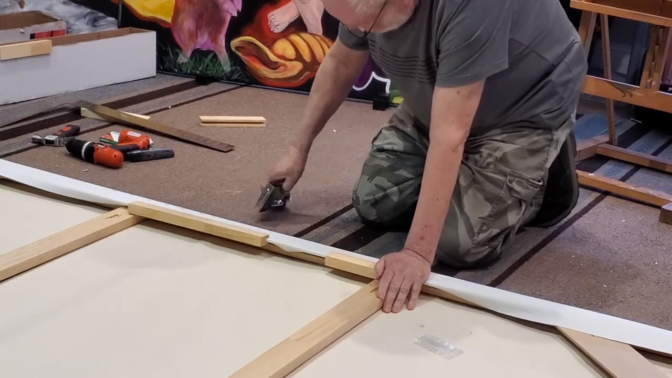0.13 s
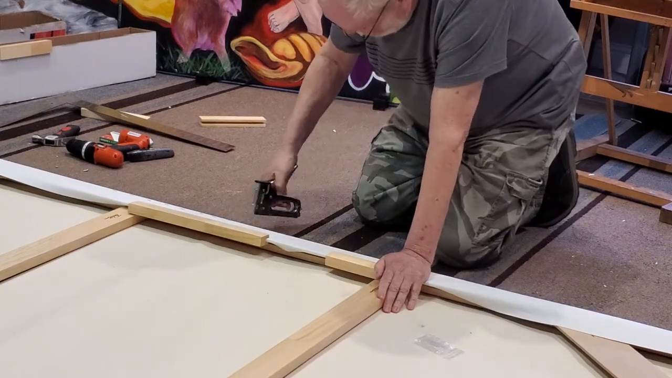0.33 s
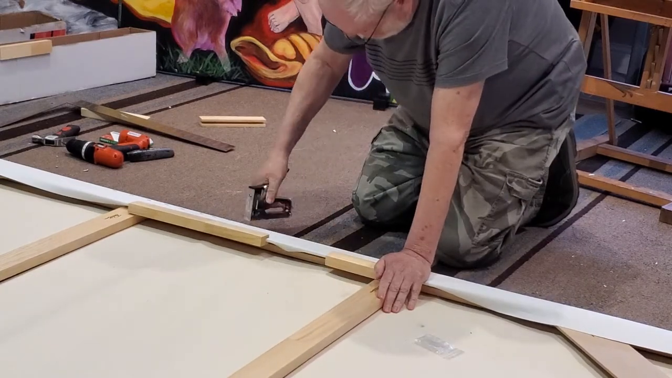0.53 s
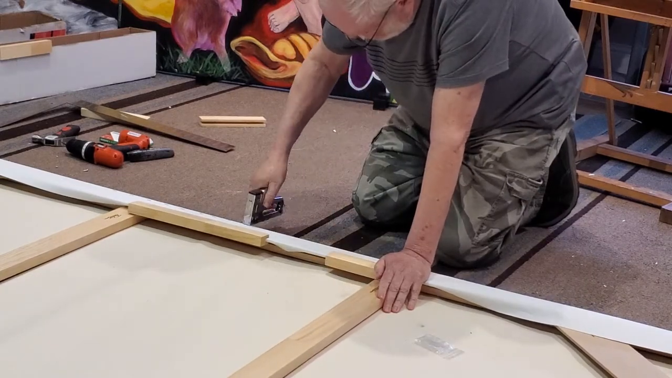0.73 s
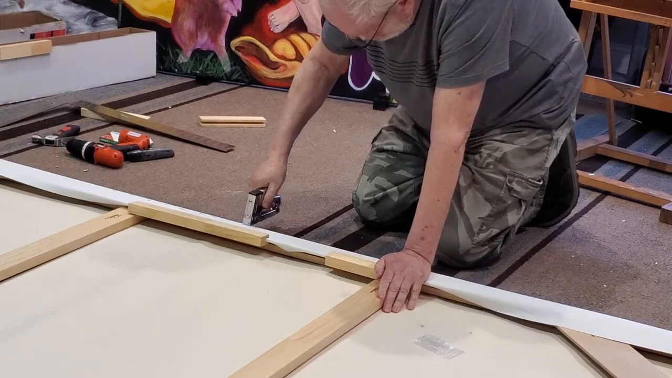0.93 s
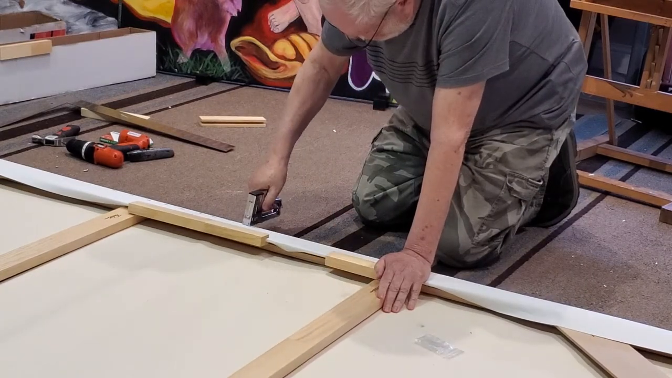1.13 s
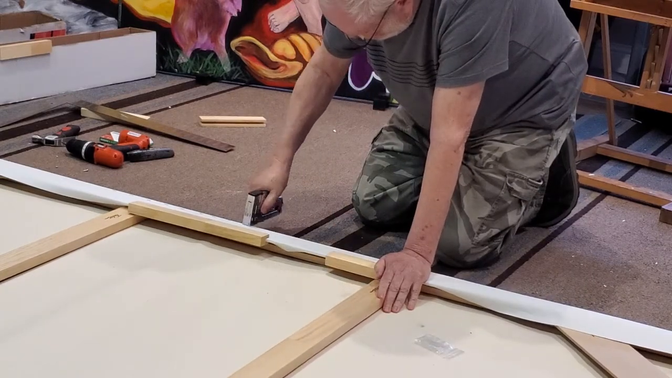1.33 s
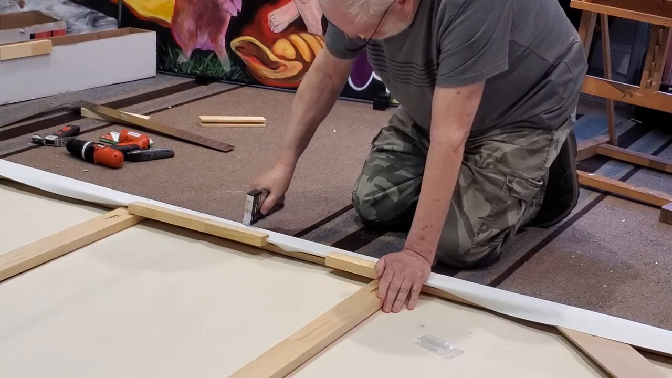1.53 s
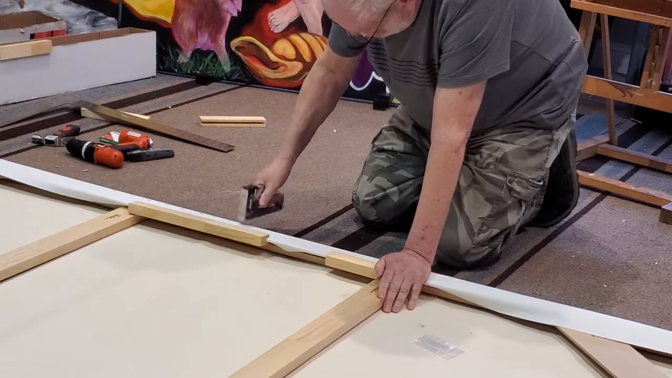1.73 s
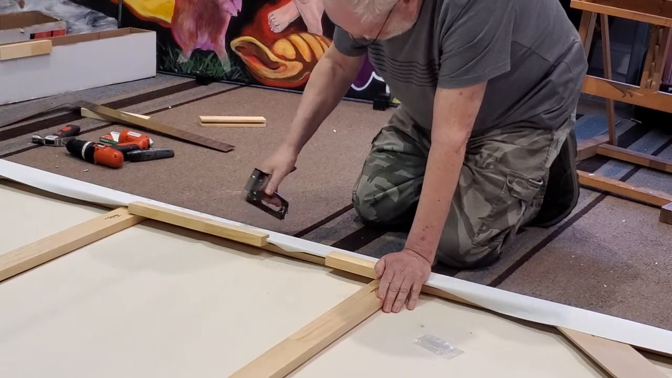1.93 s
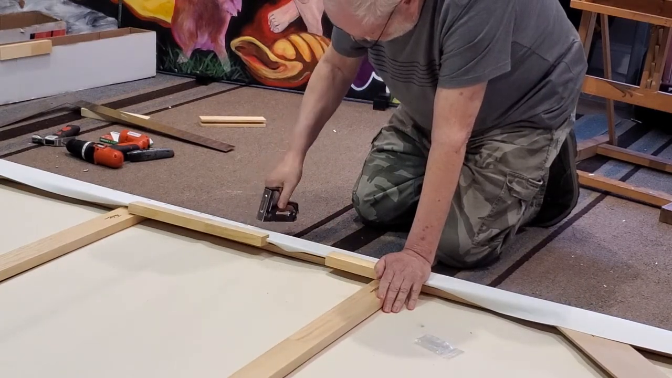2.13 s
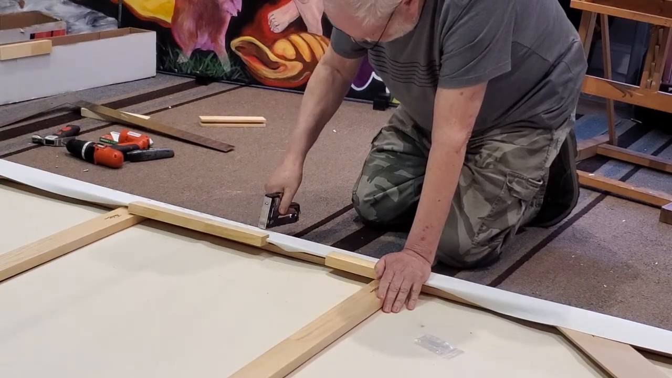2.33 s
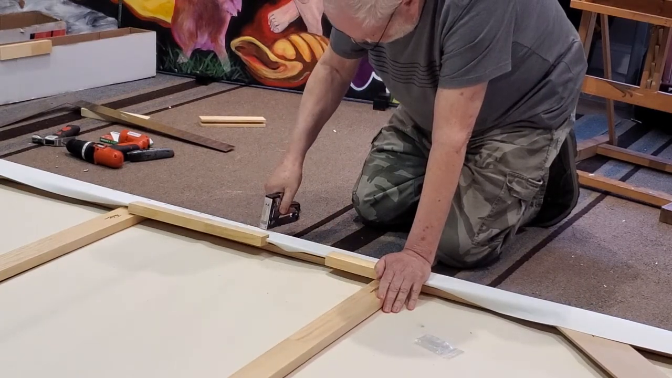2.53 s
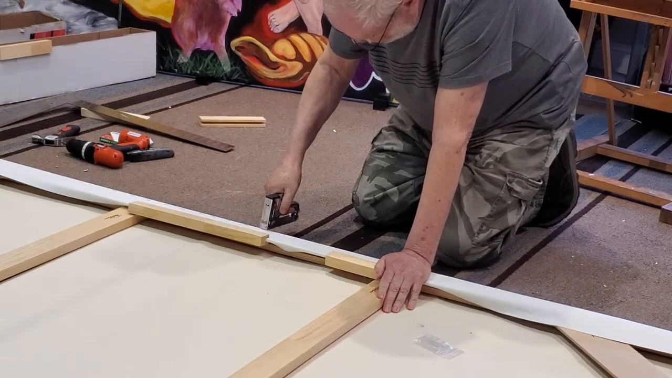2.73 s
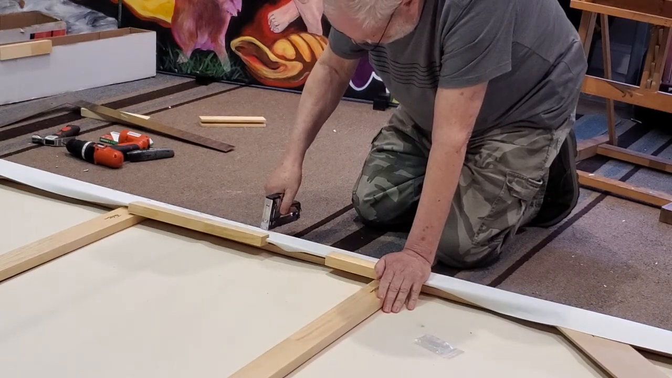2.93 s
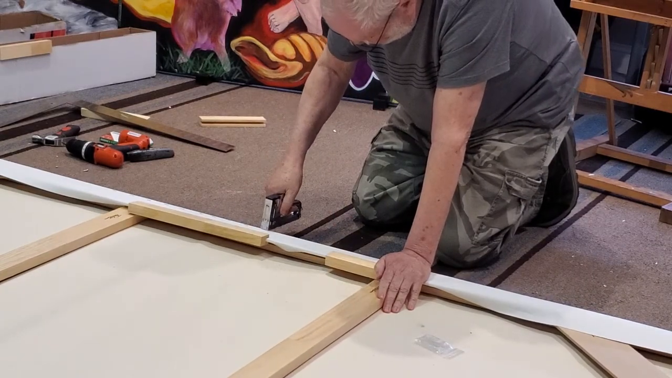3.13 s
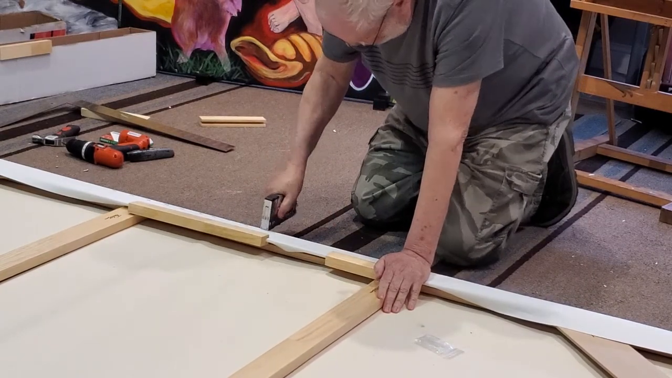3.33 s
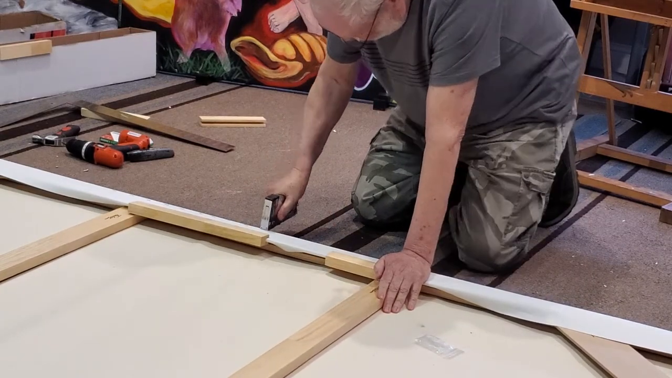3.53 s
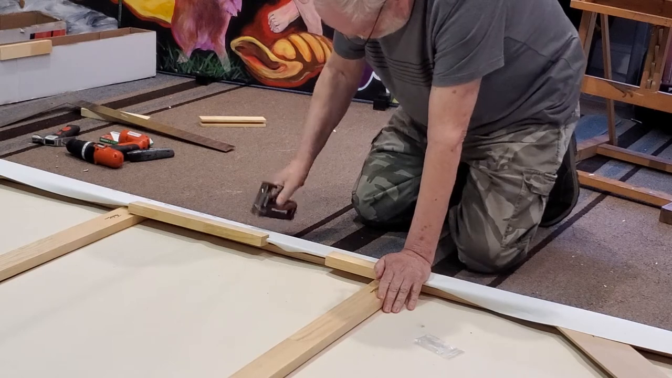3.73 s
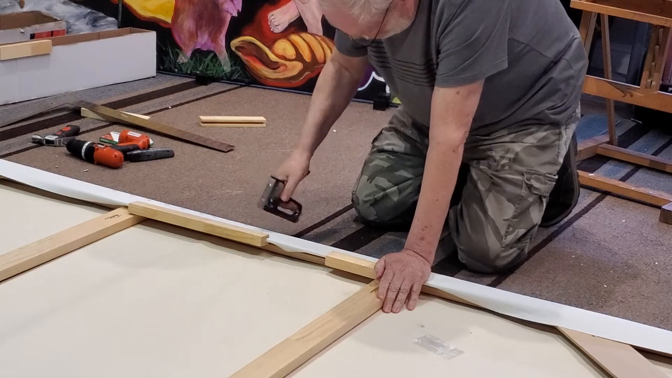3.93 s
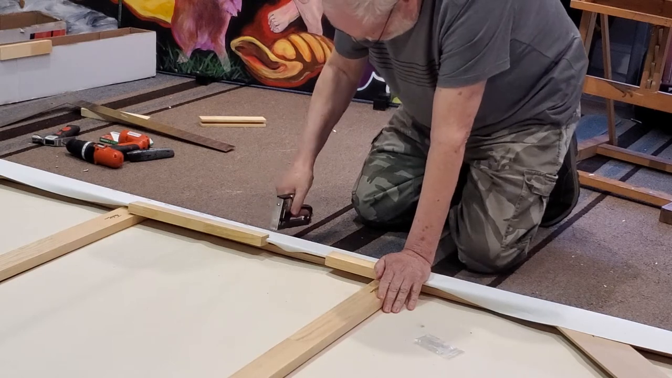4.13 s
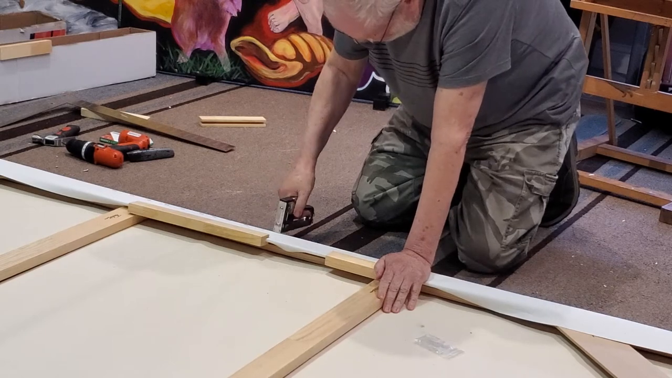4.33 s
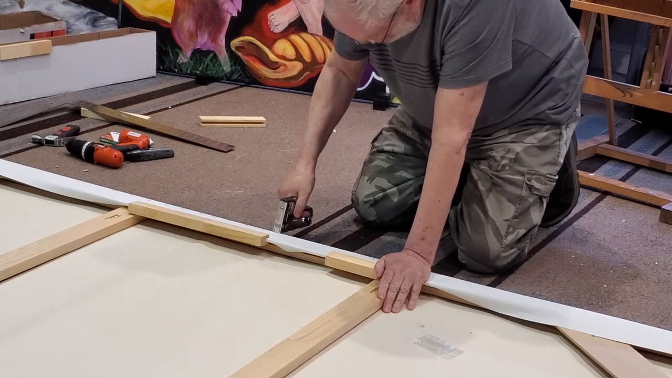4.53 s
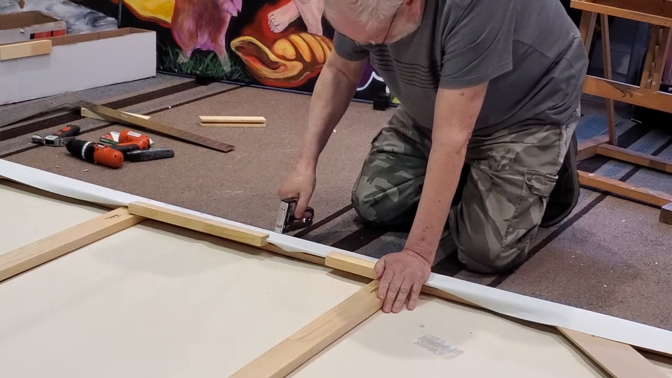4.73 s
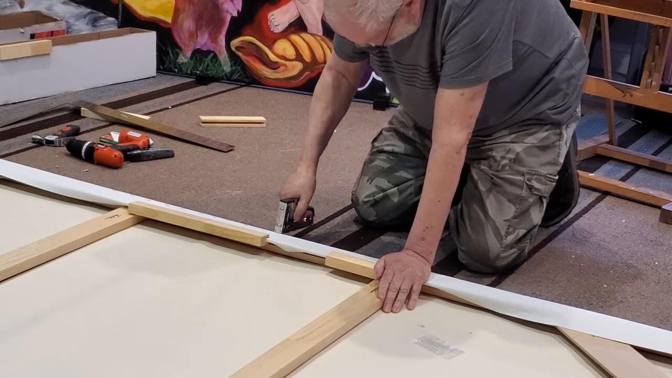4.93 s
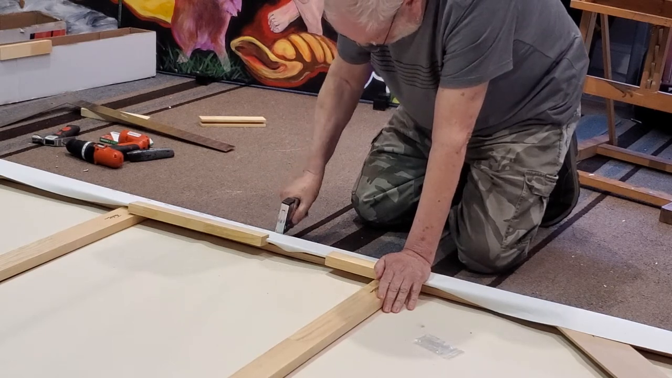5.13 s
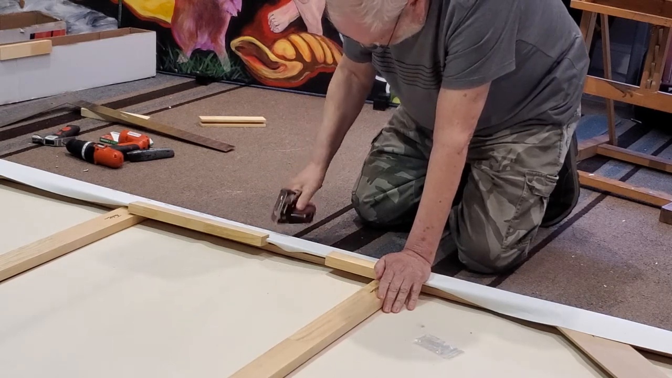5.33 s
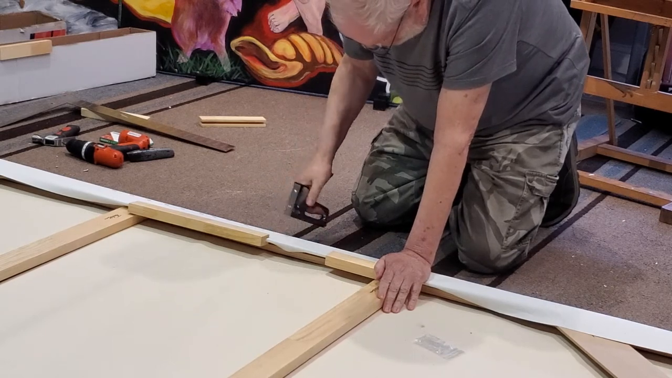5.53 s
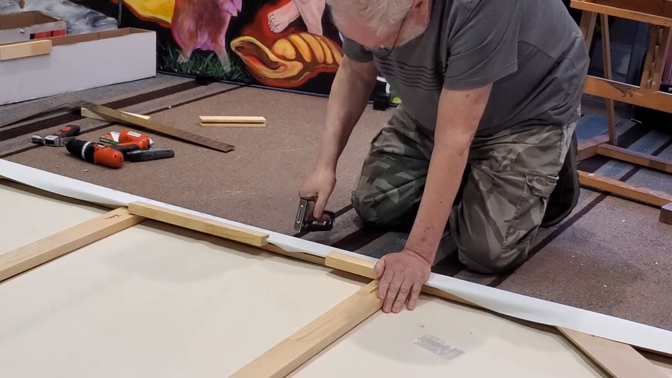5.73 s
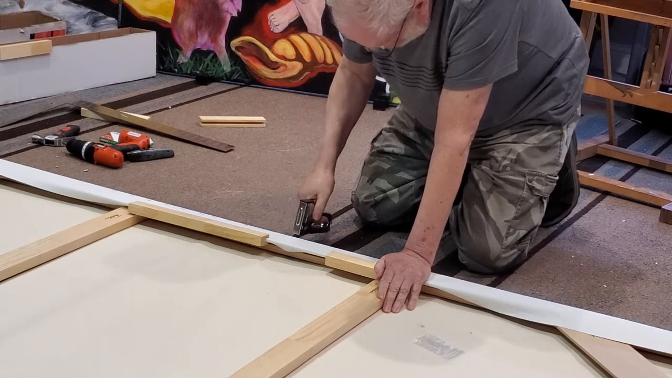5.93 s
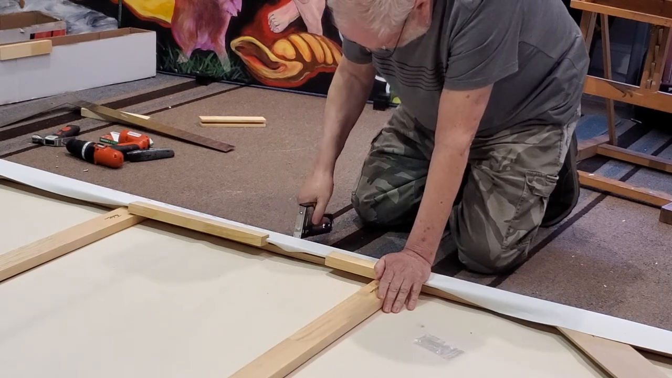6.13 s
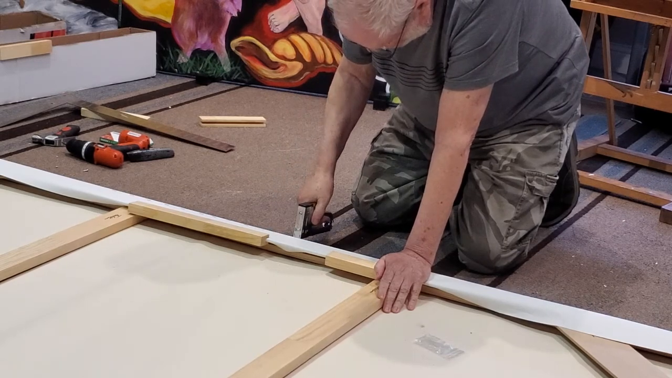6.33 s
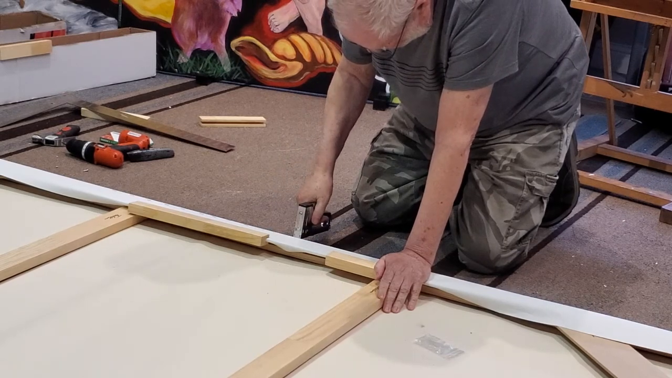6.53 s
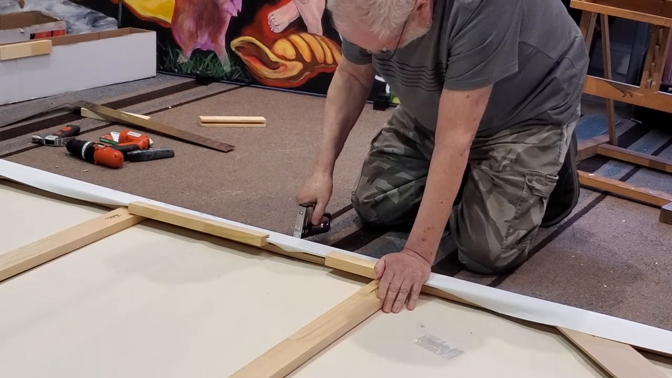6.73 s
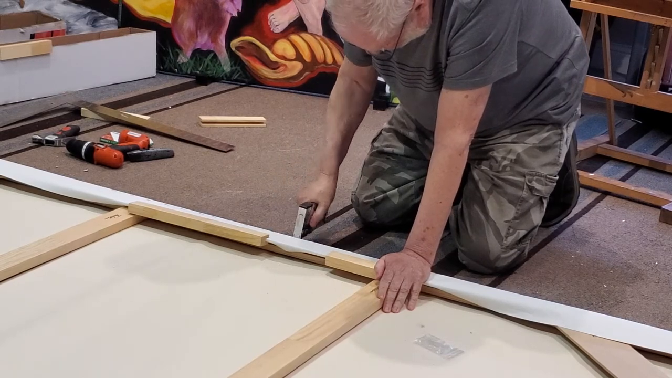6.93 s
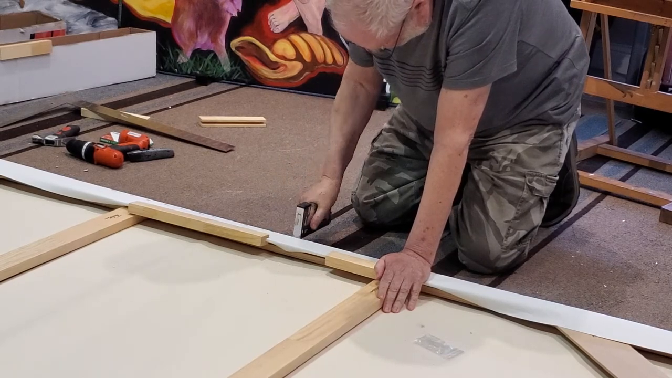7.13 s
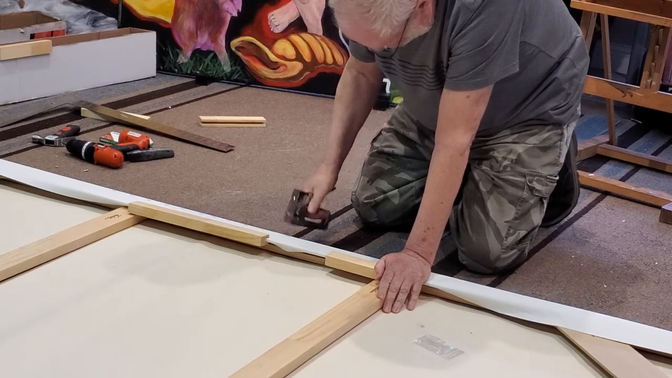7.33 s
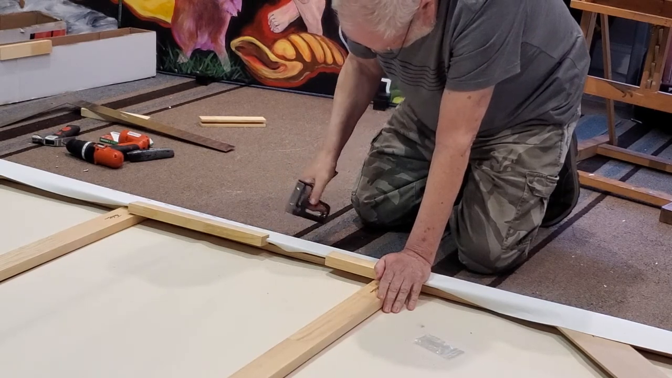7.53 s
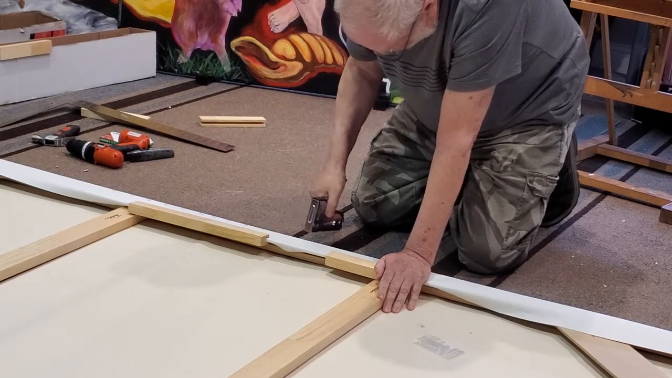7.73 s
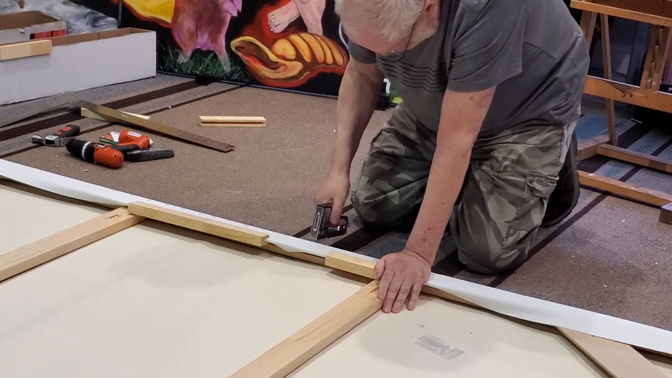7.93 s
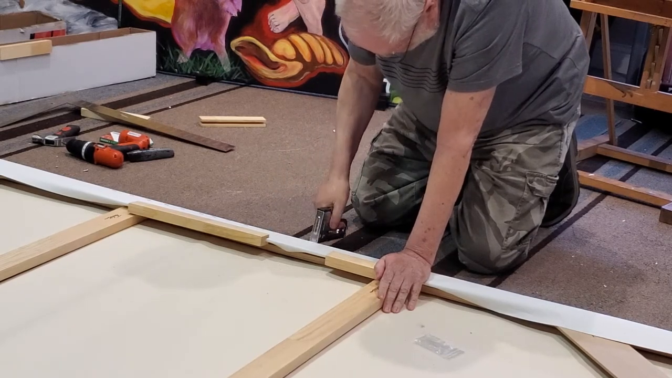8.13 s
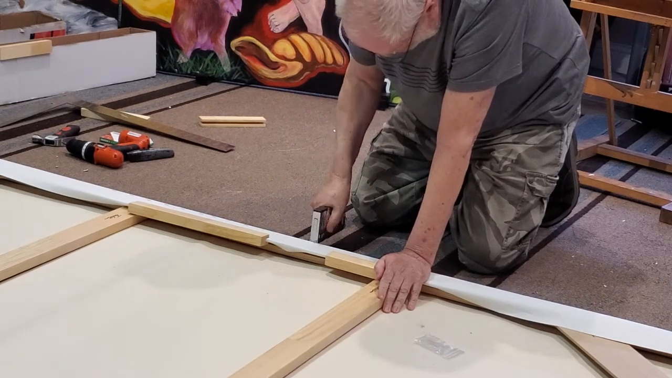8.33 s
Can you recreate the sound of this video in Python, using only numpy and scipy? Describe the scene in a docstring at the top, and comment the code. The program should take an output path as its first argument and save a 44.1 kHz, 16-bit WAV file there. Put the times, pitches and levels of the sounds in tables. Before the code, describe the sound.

A hand staple gun clicks and rattles as it is lifted in the first half second, with a few soft bumps against a wooden frame. After faint taps and a scuff on canvas, it fires at about 1.6, 3.5, 5.1 and 7.1 seconds. Each shot is a loud, sharp steel crack over a short ringing thud of wood and a slight buzz of the spring, its tone a little different each time. About 0.3 seconds after every shot, the lever springs back with a lighter, bright metal clack. Very faint ticks, lever scrapes and canvas rubs lead into the shots, and a few more come between 8 and 8.4 seconds. The gun is near and slightly to the right, and the room answers each blow with a short echo. A faint low motor and electrical hum pulses slowly underneath throughout.

```python
"""A studio floor: a hand staple gun drives four staples through canvas into a wooden stretcher frame.
The nose scuffs into place, the lever scrapes on its spring, the striker slams home and the lever clacks
back. Each hit layers a noisy steel crack over ringing wood, and the ceiling and walls answer every blow.
Underneath, a motor in the building beats slowly against the mains hum."""
import sys
import numpy as np
from scipy import signal
from scipy.fft import rfft, irfft, next_fast_len
from scipy.io import wavfile
from scipy.ndimage import uniform_filter1d, map_coordinates

SR = 44100
rng = np.random.default_rng(int(sys.argv[2]) if len(sys.argv) > 2 else 0)


def generate_wav(signal):
    """Clip the signal to [-1, 1] and save it as 16-bit WAV at the path in sys.argv[1]."""
    frames = np.transpose(np.atleast_2d(signal))
    scaled = np.clip(frames, -1, 1) * 32767
    pcm = np.round(scaled).astype(np.int16)
    wavfile.write(sys.argv[1], SR, pcm)


N = 369999
T = np.arange(SR * 3 // 4) / SR  # time axis of one hit

# Levels in the tables are relative: each layer adds its own trim.
# staple hits, each barking at its own two pitches:
# start_s, level_db, thud_db, bar_db, low_bark_hz, low_bark_db, high_bark_hz, high_bark_db
SHOTS = [(1.559, -2, -16, -18, 1120, -11.5, 2350, -14), (3.506, -3, -16, -18, 1580, -17, 2800, -15),
         (5.097, -2.5, -18.5, -19.5, 1060, -12.5, 1407, -13.5),
         (7.086, -3.5, -14.5, -17.5, 820, -13, 1660, -8.5)]
# the striker shears off a staple, drives it home and rebounds: delay_s, level_db, t60_s
STRIKER_PULSES = [(0, -11.5, .03), (.0028, 1.5, 0.016), (.005, -4, .016)]
# the lever springs back to its stop: start_s, level_db
RETURNS = [(1.8284, -10.5), (3.7967, -11.5), (5.3853, -10.5), (7.3739, -10.5)]
# lever squeezes: start_s, hold_s, level_db, squeak_hz, squeak_db
SQUEEZES = [(0.013, .05, -62.5, 3080, -12), (1.356, .16, -80, 10910, -1), (3.31, .08, -73.5, 3780, -6),
            (3.389, .08, -64.5, 3870, -7.5), (4.92, .13, -69, 1445, -4), (6.895, 0.093, -70.5, 3900, -0.5),
            (8.195, .19, -76, 3784, -10)]
# ticks of the gun in the hand: start_s, level_db, treble_db, ping_hz
TICKS = [(0.0701, -29, -11.5, 1800), (0.0964, -30.5, -8.5, 3800), (0.163, -40.5, -12, 3600),
         (0.504, -62, -23, 2000), (1.0685, -60.5, -12, 8550), (1.3551, -65, -8, 11000),
         (3.1395, -61.5, -15, 6400), (3.31, -59.5, -13, 3900), (3.3877, -55, -12.5, 3900),
         (4.9193, -53.5, -11.5, 5110), (6.784, -49, -9.5, 8900), (6.89, -59.5, -4.5, 3900),
         (6.948, -46, -7.5, 3900), (8.1933, -56.5, -8, 6420), (8.2822, -57, -11.5, 11000),
         (8.3454, -53, -2, 11000)]
# nose taps on the canvas-covered bar: start_s, level_db
TAPS = [(0.7408, -54), (0.9494, -61), (6.0577, -58.5), (8.0217, -56)]
# soft bumps against the frame: start_s, level_db
BUMPS = [(0.087, -33), (0.125, -37), (0.212, -45.5), (3.273, -46.5), (8.364, -53)]
# nose scuffs over the canvas: start_s, hold_s, level_db
SCUFFS = [(0.145, 0.073, -60), (1.409, 0.056, -63.5), (3.251, 0.22, -68), (5.033, 0.049, -73),
          (6.92, 0.044, -63.5), (8.35, .04, -61.5)]

# ringing modes: pitch_hz, level_db, t60_s
FRAME_MODES = [(88, -16.5, 0.99), (117.54, -13.5, 0.89), (150, -7, 0.45), (162, -3, 0.36), (176, -6, 0.65),
               (199.4, -3.5, 0.58), (211.5, -0.5, 0.48), (236.3, -2.5, .5), (254, -1.5, 0.38),
               (296.2, 1.5, .33), (320.5, 6, 0.17), (341.7, -6.5, 0.44), (366, -3, 0.24), (440.4, 1, 0.17),
               (607.6, -6, 0.34)]  # frame and canvas on the floor
BAR_MODES = [(909, -2.5, 0.47), (980, 2, .35), (1051, -3, 0.52), (1096, 0.5, 0.22), (1149, -3, 0.37),
             (1443, -4, 0.23), (1673, -2.5, 0.35), (1790, -4.5, 0.28)]  # wooden bar under the staple
SPRING_MODES = [(1438, -4.5, .45), (1520, -1.5, 0.38), (1577, -1.5, 0.35), (3128, -5.5, 0.62),
                (3220, -4.5, 0.45), (3696, -11, 0.5), (3670, -3.5, 0.44)]  # spring and steel case

# resonances of the gun's parts: centre_hz, width_hz, level_db
CASE_BANDS = [(1590, 110, 1.5), (3420, 490, -1), (4900, 410, -1), (6420, 790, -0.5), (8850, 320, 1.5),
              (11500, 640, 1), (14200, 750, -3)]
LEVER_BANDS = [(1550, 120, 4.5), (3700, 400, -0.5), (5160, 700, -5.5), (11240, 1600, -5)]
HANDLE_BANDS = [(1150, 290, 2), (1940, 170, 1), (2230, 130, 4), (3120, 83, 4), (3800, 300, -9),
                (10800, 1330, -11)]
NOSE_BANDS = [(1200, 240, -3.5), (1800, 360, -7), (2590, 350, -1), (3150, 280, -2), (3728, 660, -10)]

# EQ curves of the noise layers: frequency_hz, gain_db
SLAM_EQ = [(80, -15), (170, -5.5), (330, -1), (430, -2.5), (750, -5), (1200, -2), (2300, 0), (3200, 3),
           (4400, -1), (5400, -5), (6600, -4), (7600, -7.5), (9000, -5.5), (13000, -3), (15500, -5)]
CLACK_EQ = [(200, -41), (500, -15.5), (850, -17), (1200, -8), (1550, 2.5), (1850, -0.5), (2600, 0),
            (3300, 4.5), (4500, -2), (6300, -1), (7400, -2), (9000, -1.5), (12000, 6), (15500, 4)]
SCRAPE_EQ = [(700, -25.5), (1300, -8.5), (1900, -4), (2900, -5), (6000, -2.5), (11500, -5), (15500, -11.5)]
TICK_EQ = [(300, -24.5), (800, -14), (1400, -1), (2200, -5), (3100, -4.5), (4500, -4.5), (8000, -9),
           (12000, -4.5), (15500, -9.5)]
BUMP_EQ = [(60, -20), (160, 3), (300, 0.5), (450, -17), (800, -31.5), (2500, -58), (8000, -78)]
SCUFF_EQ = [(120, -9.5), (300, 3), (700, 0), (1100, -13.5), (2500, -18), (8000, -32.5)]
AIR_EQ = [(20, -9), (45, 1), (80, 4), (150, -0.5), (230, -7), (300, -11.5), (400, -20), (550, -23.5),
          (750, -31), (3300, -34.5), (5000, -40.5), (7500, -45), (12000, -41.5), (15500, -40)]

# early reflections off floor, ceiling and near walls: delay_s, level_db, right_ear_lag_s
REFLECTIONS = [(.0013, -12, 0), (.0086, -3, 0.0057), (.0098, -2.5, -.00012), (0.0121, -9.5, .00025),
               (0.0138, -8.5, -0.0045)]
# decay of the room tail: frequency_hz, t60_s
ROOM_DECAY = [(100, 0.45), (200, 0.18), (400, 0.63), (900, 0.41), (2500, 0.39), (5000, .4), (9000, .36),
              (15000, 0.26)]
# how alike the room sounds in both ears: frequency_hz, correlation
STEREO_LIKENESS = [(60, 0.67), (130, .97), (290, 0.72), (640, 0.38), (1400, -0.18), (3100, -0.15),
                   (15000, 0.13)]
# level ride of the motor hum: time_s, level_db
MOTOR_RIDE = [(0.0, -43.5), (0.45, -46), (1.5, -47.0), (1.95, -49.5), (2.33, -56.5), (2.64, -51.5),
              (2.9, -59.5), (3.28, -51.0), (3.95, -54), (4.2, -63.5), (4.7, -57.5), (5.0, -61.5),
              (5.35, -53), (5.6, -57), (6.35, -55), (6.65, -49), (7.3, -48.5), (8.39, -50.5)]
# faint overtones of the hum: pitch_hz, level_db
WHINE = [(177, -70.5), (240, -77.5), (353, -87), (530, -91), (1950, -103), (2062, -100), (2530, -103)]


def shots():
    """The catch slips, then the striker slams home: steel cracks, the bar barks and the frame thuds."""
    out = np.zeros((2, N))
    force = np.sqrt(sum((amp(db) * fade(t60, delay)) ** 2 for delay, db, t60 in STRIKER_PULSES))
    for start, db, thud_db, bar_db, low_hz, low_db, high_hz, high_db in SHOTS:
        catch = norm(eq(blow(fade(t60=.022), wet_db=11, grit_db=2), TICK_EQ))
        add(out, start - .009, amp(db - 8) * catch)
        steel = norm(eq(blow(force, wet_db=11.5, grit_db=1.5), SLAM_EQ))
        bar = amp(bar_db + 4) * ring(BAR_MODES, attack_s=.0044, spread_rad=1.5)
        wood = bar + amp(low_db) * bark(force, low_hz) + amp(high_db) * bark(force, high_hz)
        spring = amp(-20) * ring(SPRING_MODES, attack_s=.0052, spread_rad=1.7)
        case = amp(-22) * rattle(CASE_BANDS, t60=.57)
        add(out, start, amp(db + 21) * (steel + wood + spring + case))
        # the big frame takes a few milliseconds to get moving
        thud = ring(FRAME_MODES, attack_s=.0028, spread_rad=.15)
        add(out, start + .002, amp(db + thud_db + 27) * thud)
    return out


def bark(force, hz, width_hz=180):
    """The wood around the staple answers the blow in one broad resonance."""
    return norm(resonate(blow(force, wet_db=12.5, grit_db=-.5), [(hz, width_hz, 0)]))


def lever_returns():
    """The released lever slides, hits its stop and the striker drops over the catch: all steel."""
    out = np.zeros((2, N))
    slide = amp(-15) * fade(t60=.03)
    force = slide + fade(t60=.0051, start=.0026) + amp(1.5) * fade(t60=.0081, start=.0025)
    for start, db in RETURNS:
        clack = norm(eq(blow(force, wet_db=11, grit_db=.5), CLACK_EQ))
        case = amp(-4.5) * norm(resonate(blow(force, wet_db=4.5, grit_db=3.5), CASE_BANDS))
        spring = amp(-24) * ring(SPRING_MODES, attack_s=.003, spread_rad=2.4)
        add(out, start - .003, amp(db + 19) * (clack + case + spring))
        # lead-in: the lever rubs along the spring on its way back
        add(out, start - .06, amp(db - 6.5) * rattle(LEVER_BANDS, t60=.4))
    return out


def handling():
    """Loose parts tick and ping as the gun is gripped; its nose taps; hand and knee bump the frame."""
    out = np.zeros((2, N))
    touch = fade(t60=.014)
    for start, db, treble_db, ping_hz in TICKS:
        contact = eq(blow(touch, wet_db=11, grit_db=1), TICK_EQ)
        tick = norm(eq(contact, [(3500, 0), (7000, treble_db + 11)]))  # treble shelf
        ping_band = [(ping_hz, .089 * ping_hz, 0)]
        ping = amp(-7) * norm(resonate(blow(touch, wet_db=9, grit_db=0), ping_band))
        spring = amp(-15) * ring(SPRING_MODES, attack_s=.0033, spread_rad=2.7)
        add(out, start, amp(db + 18.5) * (tick + ping + spring))
    add(out, .07, amp(-25.5) * rattle(HANDLE_BANDS, t60=1.8))  # lifting the gun jars the handle
    for start, db in TAPS:
        tap = norm(resonate(blow(fade(t60=.0073), wet_db=9, grit_db=6), NOSE_BANDS))
        add(out, start, amp(db + 18.5) * tap)
    for start, db in BUMPS:
        bump = norm(eq(blow(fade(t60=.018), wet_db=2.5, grit_db=.5), BUMP_EQ))
        add(out, start, amp(db + 25.5) * bump)
    return out


def lever_squeezes():
    """The lever scrapes on its spring in small slips, with a faint squeak pitched anew for each grip."""
    body = unit(resonate(friction(slip_db=2.5), LEVER_BANDS))
    scrape = amp(-.5) * unit(eq(friction(slip_db=.5), SCRAPE_EQ))
    steel = unit(body + scrape)
    rub = friction(slip_db=4)
    out = np.zeros((2, N))
    for start, hold, db, squeak_hz, squeak_db in SQUEEZES:
        squeak = amp(squeak_db) * unit(resonate(rub, [(squeak_hz, .08 * squeak_hz, 0)]))
        out += amp(db) * gesture(start, hold, attack_s=.021, release_s=.07) * (steel + squeak)
    return out


def canvas_scuffs():
    """The nose slides over the canvas with a dull rub as it is pressed into place."""
    pressure = sum(amp(db) * gesture(start, hold, attack_s=.019, release_s=.11)
                   for start, hold, db in SCUFFS)
    return pressure * unit(eq(friction(slip_db=.5), SCUFF_EQ))


def room_tone(motor_hz=58.85, mains_hz=60):
    """A motor runs just under mains frequency, so their second harmonics beat over a bed of still air."""
    t = np.arange(N) / SR

    def tone(hz, drift_rad):
        # the hums swell together at 0.1 s
        return np.sqrt(2) * np.cos(2 * np.pi * hz * (t - .1) + drift_rad * wobble(1.7))

    ride = amp(np.interp(t, *np.transpose(MOTOR_RIDE)))
    motor = ride * tone(motor_hz, drift_rad=.15) + amp(-62.5) * tone(2 * motor_hz, drift_rad=.36)
    mains = amp(-55 + 1.9 * wobble(2.3)) * tone(2 * mains_hz, drift_rad=.1)
    whine = sum(amp(db) * tone(hz, drift_rad=.79) for hz, db in WHINE)
    air = amp(-61) * unit(eq(diffuse(N), AIR_EQ))
    return motor + mains + whine + air


def blow(force, wet_db, grit_db, build_s=.0057):
    """A gritty burst shaped by the force: direct sound, early reflections and a tail that dies by band."""
    size = SR // 16

    def chatter():
        # the gun sends a different fine pattern in each direction
        burst = force[:size] * rng.standard_normal(size)
        grit = unit(uniform_filter1d(rng.standard_normal(size), size=6))
        return norm(burst * amp(grit_db * grit))

    out = np.zeros((2, len(T)))
    add(out, 0, chatter())
    for delay, db, right_lag in REFLECTIONS:
        echo = amp(db) * chatter()
        add(out[:1], delay, echo)
        add(out[1:], delay + right_lag, echo)
    hz, t, bands = signal.stft(diffuse(len(T)), SR, nperseg=256)
    decay = np.exp(-np.log(1000) * t / curve_at(ROOM_DECAY, hz)[:, None])
    tail = signal.istft(bands * decay, SR, nperseg=256)[1][:, :len(T)]
    bloom = np.sqrt(np.cumsum(norm(force) ** 2)) * (1 - np.exp(-T / build_s))
    return norm(out + amp(wet_db) * norm(tail * bloom))


def ring(modes, attack_s, spread_rad):
    """Struck modes ring down, varied on each hit; phase scatter between the ears gives them width."""
    out = np.zeros((2, len(T)))
    for (hz, db, t60), (level, detune, ear) in zip(modes, rng.standard_normal((len(modes), 3))):
        phase = rng.uniform(0, 2 * np.pi) + spread_rad * ear * np.array([[-.5], [.5]])
        pitch_hz = hz * (1 + .0027 * detune)
        out += amp(db + 1.2 * level) * fade(t60) * np.sin(2 * np.pi * pitch_hz * T + phase)
    return norm(out * (1 - np.exp(-T / attack_s)))


def rattle(bands, t60):
    """Loose steel parts go on buzzing in their resonances after a jolt."""
    envelope = fade(t60) * (1 - fade(t60=.03))
    return norm(resonate(diffuse(len(T)) * envelope, bands))


def friction(slip_db):
    """Rubbing noise that catches and slips unevenly."""
    return diffuse(N) * amp(slip_db * wobble(150))


def diffuse(size):
    """Noise from all around: centred in the bass, wide in the treble."""
    def mid_side_gains(hz):
        angle = np.arccos(np.clip(curve_at(STEREO_LIKENESS, hz), -1, 1)) / 2
        return np.array([np.cos(angle), np.sin(angle)])
    mid, side = filtered(rng.standard_normal((2, size)), mid_side_gains)
    return np.array([mid + side, mid - side])


def gesture(start, hold, attack_s, release_s):
    """Envelope of one hand movement: it rises, holds and dies away."""
    since = np.arange(N) / SR - start
    return np.clip(since / attack_s, 0, 1) * np.exp(-np.maximum(since - hold, 0) / release_s)


def fade(t60, start=0):
    """A decay from the start time on, falling 60 dB in t60 seconds."""
    return (T >= start) * np.exp(-np.log(1000) * np.abs(T - start) / np.maximum(t60, 1e-4))


def wobble(rate_hz):
    """Smooth random modulation."""
    knots = rng.standard_normal(int(N * rate_hz / SR) + 4)
    return map_coordinates(knots, [np.arange(N) * rate_hz / SR])


def eq(x, curve):
    """Minimum-phase EQ through (frequency_hz, gain_db) points."""
    def response(hz):
        cepstrum = irfft(np.log(amp(curve_at(curve, hz))))
        half = len(cepstrum) // 2
        return np.exp(rfft(np.r_[cepstrum[0], 2 * cepstrum[1:half], np.zeros(half)]))
    return filtered(x, response)


def resonate(x, bands):
    """Parallel band-passes of alternating polarity."""
    def response(hz):
        return sum((-1) ** k * amp(db) * 1j * hz * width / (centre ** 2 - hz ** 2 + 1j * hz * width)
                   for k, (centre, width, db) in enumerate(bands))
    return filtered(x, response)


def filtered(x, response):
    """Apply a complex frequency response, padded to let it ring out."""
    size = 2 * next_fast_len(x.shape[-1] // 2 + SR // 8)
    hz = np.fft.rfftfreq(size, 1 / SR)
    return irfft(rfft(x, size) * response(hz), size)[..., :x.shape[-1]]


def curve_at(points, hz):
    """Read (frequency_hz, value) points on a log axis."""
    knots_hz, values = np.transpose(points)
    return np.interp(np.log(hz + 1), np.log(knots_hz), values)


def add(track, start, sound):
    """Mix a sound into the track at its start time."""
    part = track[:, max(round(start * SR), 0):][:, :sound.shape[-1]]
    part += sound[..., :part.shape[-1]]


def amp(db):
    """Decibels to gain."""
    return 10 ** (np.asarray(db) / 20)


def unit(x):
    """Scale to rms 1."""
    return x / np.sqrt(np.mean(x ** 2) + 1e-20)


def norm(x):
    """Scale to an average energy of 1 per channel."""
    return unit(x) / np.sqrt(x.shape[-1])


def scene():
    """The gun works up front over the room tone, both leaning a little to the right."""
    gun = shots() + lever_returns() + handling() + lever_squeezes() + canvas_scuffs()
    return gun * amp([[-.55], [.55]]) + room_tone() * amp([[-.3], [.3]])


def record(dry):
    """A soft clip rounds off the highest peaks, then a steep low-pass trims the very top."""
    cutoff_hz = 15950
    clipped = dry / (1 + np.abs(dry) ** 6) ** (1 / 6)
    return filtered(clipped, lambda hz: 1 / (1 + (hz / cutoff_hz) ** 160))


dry = scene()
out = record(dry)
generate_wav(out)
```